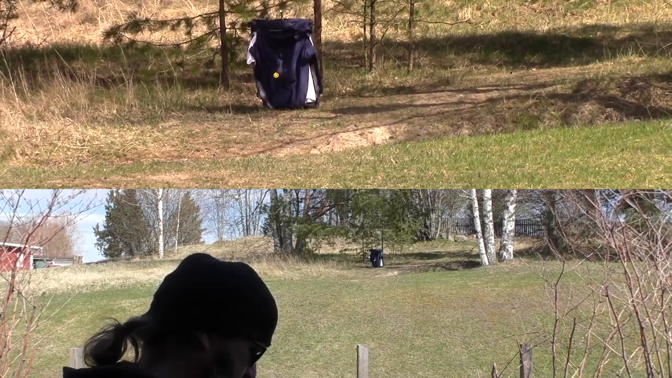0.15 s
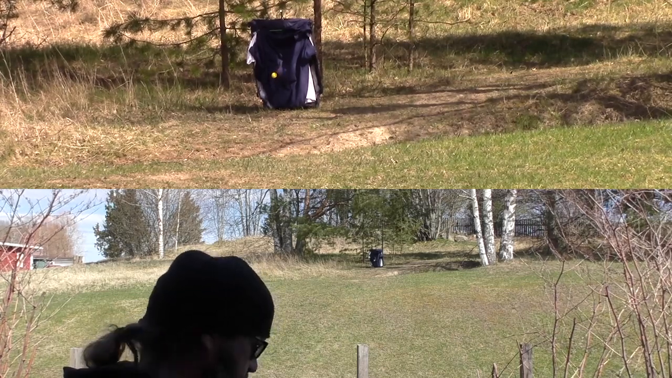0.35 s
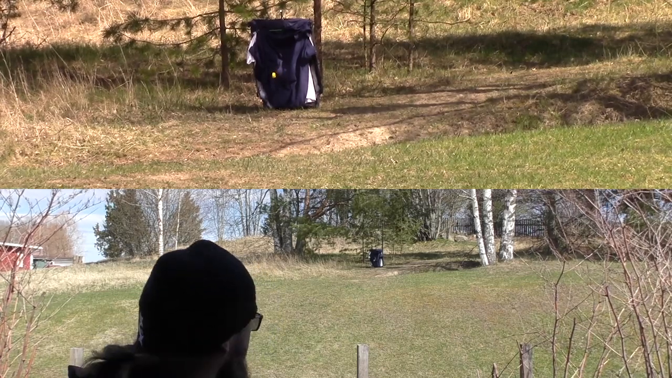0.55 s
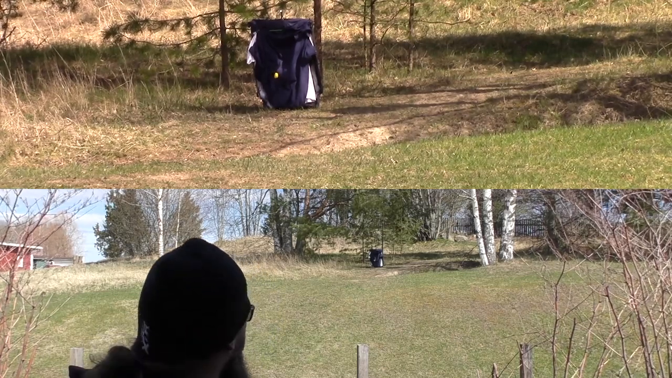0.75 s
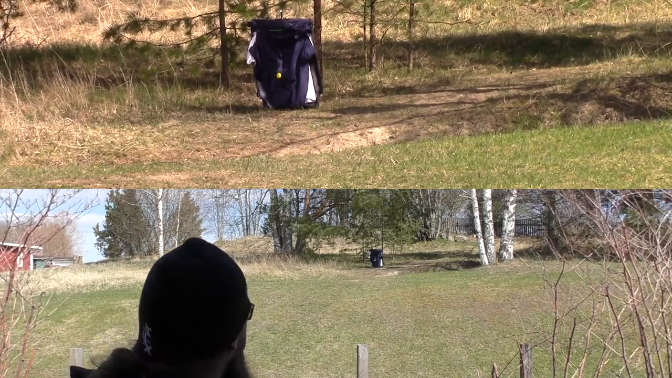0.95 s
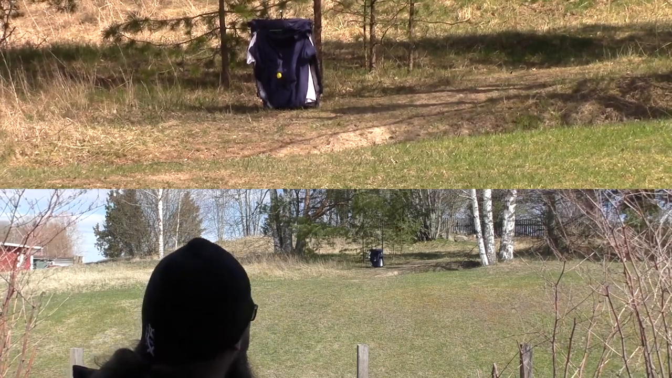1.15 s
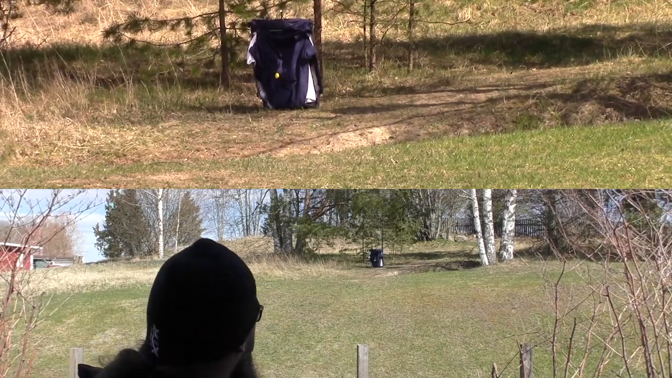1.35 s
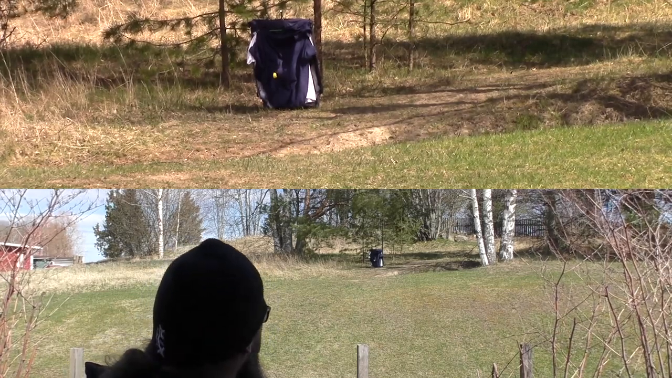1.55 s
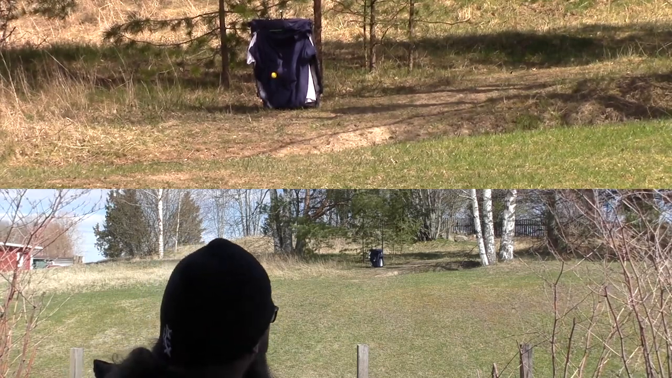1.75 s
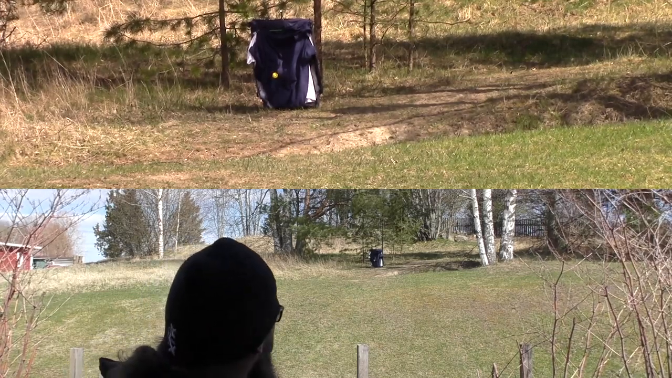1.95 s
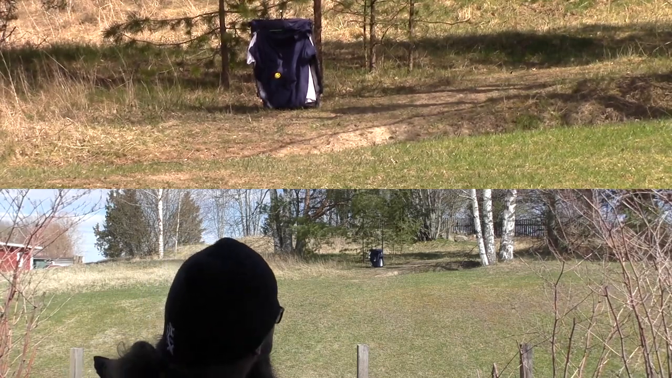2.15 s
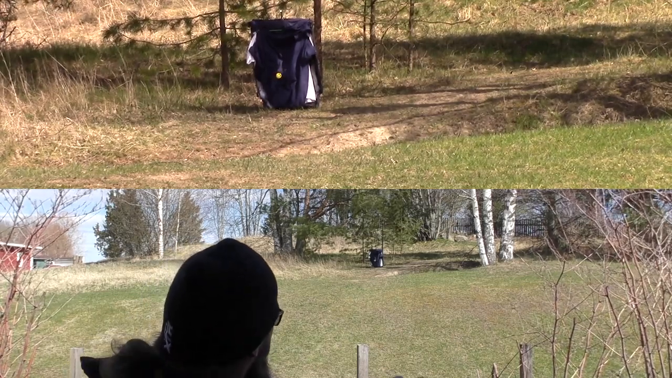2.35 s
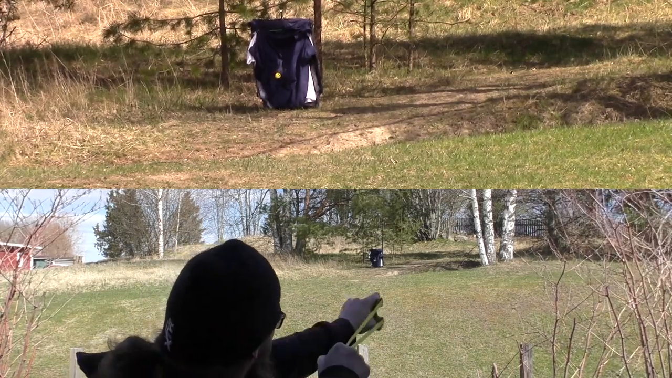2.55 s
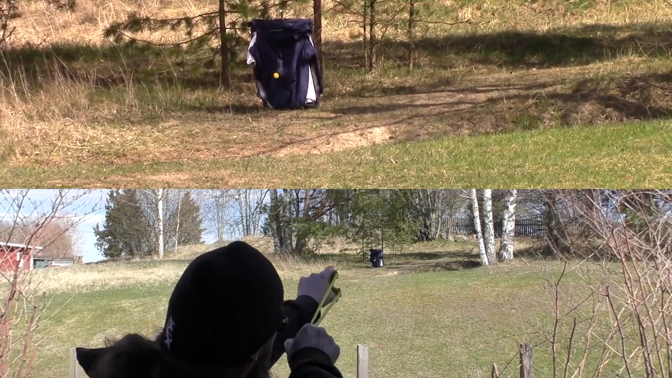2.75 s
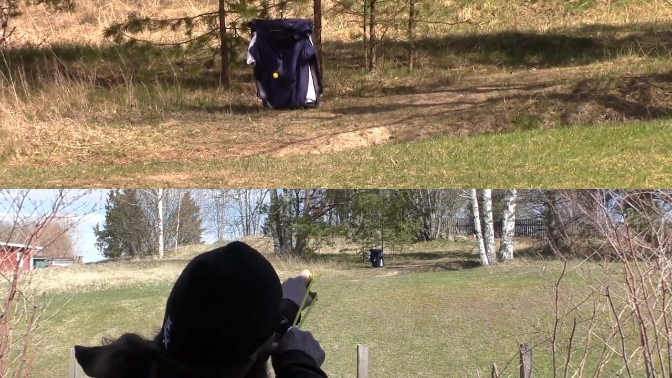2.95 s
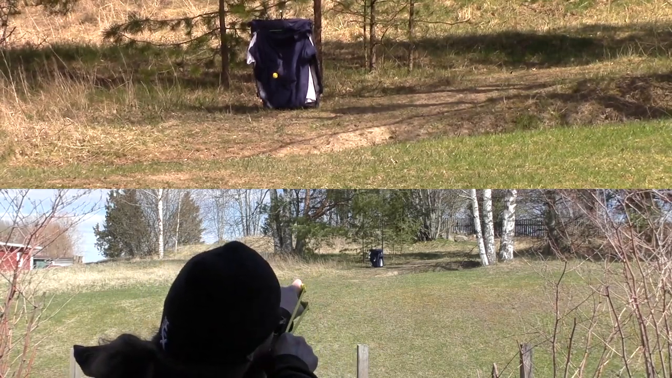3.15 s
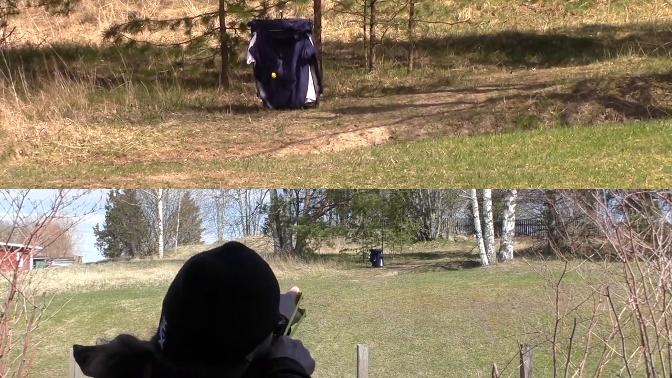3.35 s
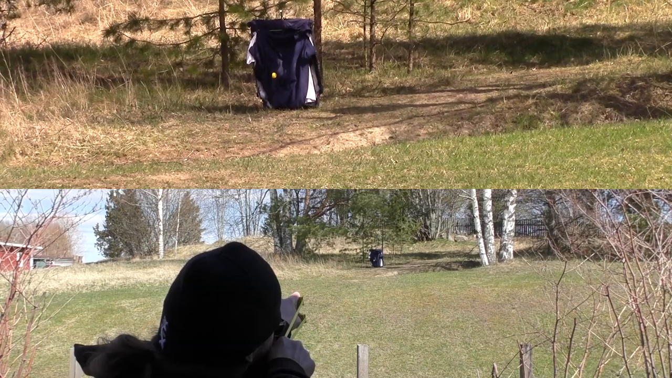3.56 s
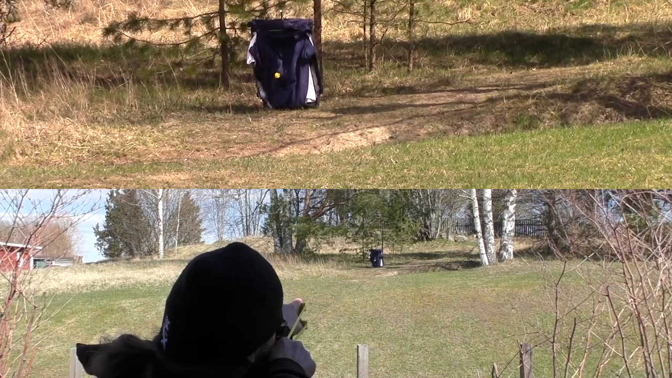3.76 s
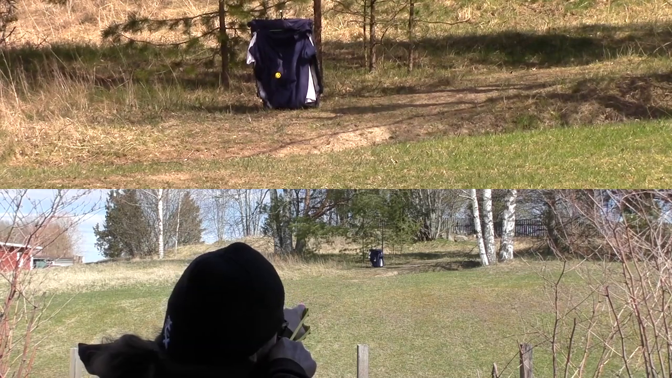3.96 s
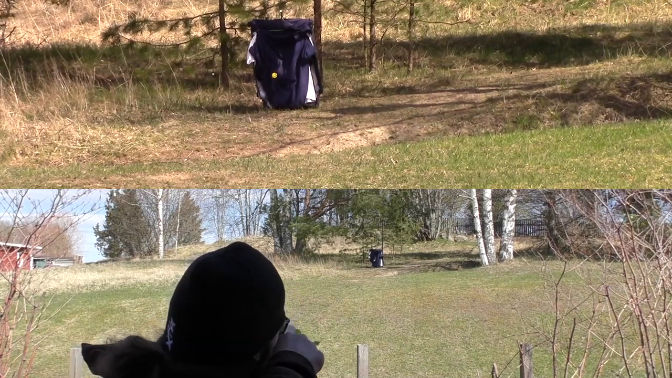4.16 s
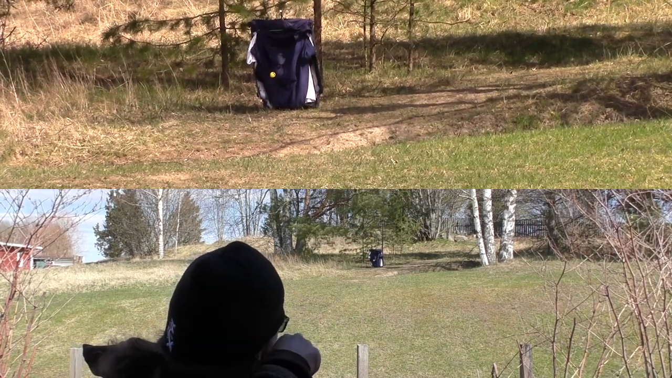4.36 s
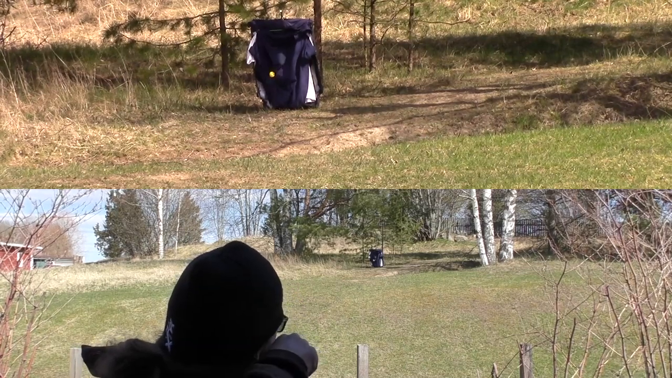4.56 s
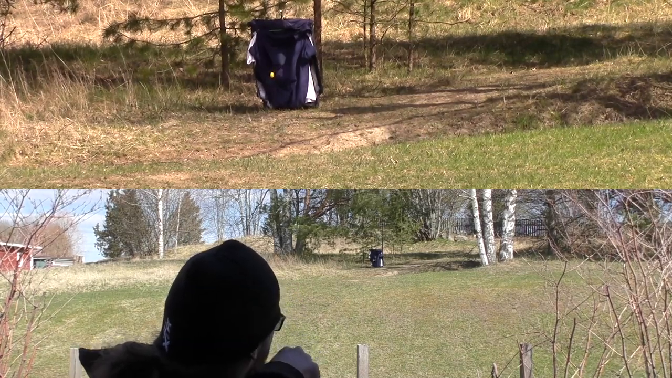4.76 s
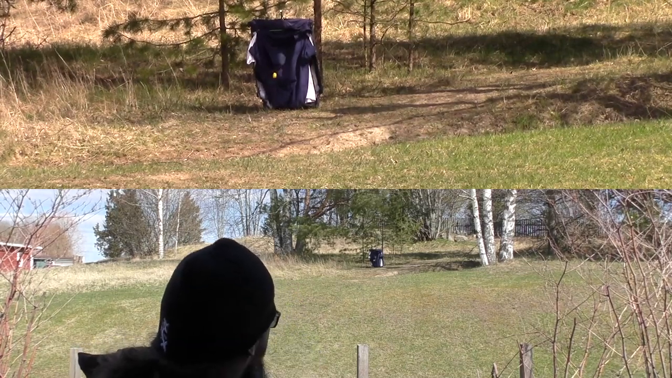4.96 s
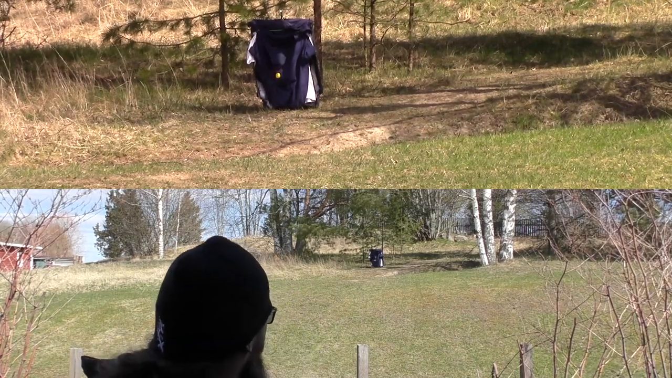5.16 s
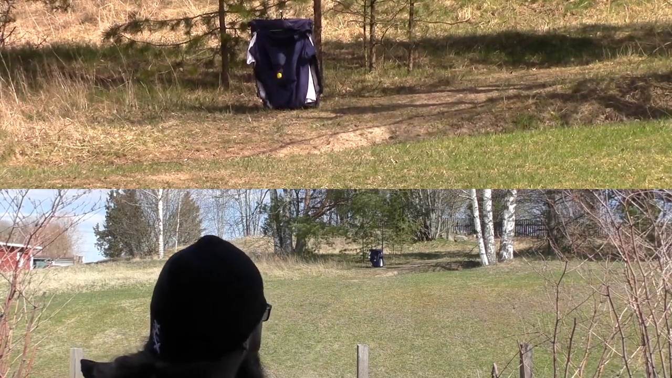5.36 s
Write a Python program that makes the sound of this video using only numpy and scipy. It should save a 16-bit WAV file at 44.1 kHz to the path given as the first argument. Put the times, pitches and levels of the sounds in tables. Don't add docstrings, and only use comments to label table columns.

```python
import sys
import numpy as np
from scipy import signal
from scipy.fft import rfft, irfft, next_fast_len
from scipy.io import wavfile
from scipy.ndimage import uniform_filter1d, map_coordinates

SR = 44100
rng = np.random.default_rng(int(sys.argv[2]) if len(sys.argv) > 2 else 0)


def gain_from_db(level_db):
    decades = np.asarray(level_db, float) / 20
    return 10 ** decades


def dump(signal):
    limited = np.clip(np.atleast_2d(signal).T, -1, 1)
    pcm = np.round(limited * 32767).astype(np.int16)
    wavfile.write(sys.argv[1], SR, pcm)


N = 238400
TIME_S = np.arange(N) / SR

# (frequency [Hz], density [dB per Hz])
BREEZE_SPECTRUM = [(15, -44), (25, -18), (54, 0.5), (91, -5), (113, -1.5), (130, -4), (170, -32),
                   (290, -120)]
# (frequency [Hz], density [dB per Hz])
TRAFFIC_SPECTRUM = [(60, -28), (150, -12.5), (330, -6.5), (480, -3), (560, -10), (800, -11.5), (980, -6.5),
                    (1100, -1), (1250, -6), (1760, -10), (3250, -14.5), (5080, -21), (10900, -24),
                    (16000, -27)]
# (frequency [Hz], density [dB per Hz])
CAR_SPECTRUM = [(70, -23), (120, -2), (180, -0.5), (300, -1.5), (460, -5), (560, -21.5), (800, -60.5)]
# (time [s], level [dB])
CAR_LEVEL = [
    (0, -55),
    (.4, -55),
    (.95, -51),
    (1.4, -54.5),
    (2.7, -55.5),
    (4.2, -57),
    (5.41, -60),
]
# (time [s], held [s], level [dB], pitch [Hz], fade [dB per s])
ENGINES = [
    (.62, 1.0, -59, 170, 30),
    (.45, .5, -62, 127, 30),
    (1.8, .5, -57, 121, 35),
    (5.17, .08, -58, 420, 90),
    (3.66, .06, -58, 205, 120),
]
# (time [s], level [dB], frequency [Hz], t60 [s])
BUFFETS = [
    (1.405, -34.5, 70, 0.086),
    (2.19, -47, 65.1, .1),
    (2.89, -45, 60, .1),
    (4.113, -26.5, 89, 0.1),
]
# (frequency [Hz], correlation [0-1])
LIKENESS = [(60, .8), (290, 0.88), (640, 0.94), (1400, .62), (3100, .45), (6800, 0.86), (15000, 0.62)]
# (time [s], held [s], rub level [dB], sliding over rubbing [dB])
MOVES = [(0.008, 0, -58, 0), (0.065, 0.07, -61.4, -12.9), (0.218, 0.17, -65.4, 1.0), (0.447, 0.03, -57, 1),
         (0.548, 0.0, -61.0, -3.3), (0.656, 0.0, -57.1, -15.3), (0.723, 0.23, -69.3, -0.5),
         (1.013, 0.48, -59.6, -3.6), (1.2, 0.03, -56.7, -6.2), (1.44, 0.14, -57.2, -3.1),
         (1.611, 0.42, -60.5, -9), (2.01, 0.01, -61.4, 0.3), (2.2, 0.18, -61.7, -4.7),
         (2.297, 0.0, -61.5, 4.3), (2.42, 0.02, -56.7, 0.7), (2.535, 0.0, -62.0, -2.6),
         (2.657, 0.11, -63.0, -9.9), (2.844, 0.0, -59.3, -1.5), (2.954, 0.04, -55.6, -2.1),
         (3.007, 0.05, -56.3, -12.8), (3.169, 0.05, -53.8, -7.5), (3.27, 0.21, -58.8, -8.2),
         (3.477, 0.03, -56.1, -1.5), (3.529, 0.33, -58.5, -5), (4.041, 0.02, -63.9, -5.5),
         (4.328, 0.16, -63.4, -4.4), (4.695, 0.11, -62.9, -4.8), (5.079, 0.01, -60.5, -8.5),
         (5.219, 0.05, -59, -4), (5.392, 0.02, -59, -3)]
# (time [s], peak level [dB], frequency [Hz], t60 [s])
CREASES = [(.245, -48, 12000, .04), (.297, -43, 11700, .02), (.439, -44, 11800, .02),
           (0.452, -36, 4000, 0.09), (.452, -46, 11000, .03), (.653, -41, 3200, 0.055),
           (0.964, -47, 10500, 0.032), (1.337, -46, 3500, .02), (1.657, -41, 6480, .04),
           (1.909, -33, 2390, 0.0087), (2.3, -40, 8510, 0.044), (2.418, -37, 8790, 0.031),
           (2.42, -43, 12500, .02), (2.755, -43.5, 9000, 0.018), (2.985, -45, 10900, .02),
           (2.95, -44, 2675, 0.18), (3.02, -44, 2730, .12), (3.22, -45, 3190, .08), (1.35, -42, 2600, .06),
           (3.4, -43, 3500, .02), (3.187, -37.5, 4790, .06), (3.475, -47, 12500, .02),
           (3.49, -42, 4500, .04), (4.342, -40, 2750, .04), (4.702, -44, 6500, .04),
           (4.704, -44, 4500, 0.046), (5.219, -39, 10400, .025), (5.22, -40, 4000, 0.022),
           (5.245, -41, 2600, .08)]
# (frequency [Hz], density [dB per Hz])
RUB_SPECTRUM = [(800, -30), (1500, -1), (3000, 3), (5000, -1.5), (8000, -16), (16000, -40)]
# (frequency [Hz], density [dB per Hz])
SLIDE_SPECTRUM = [(3000, -35), (5500, 0), (8000, 0), (12000, -1), (16000, -7)]
# (time [s], click level [dB], barrel level [dB], click pitch [Hz], top part boost [dB])
KNOCKS = [
    (4.4406, -16, 0.5, 3100, 2),
    (4.4442, -21, -12, 3500, -6),
]
# (pitch ratio [1], level [dB], length [cycles])
CLICK_PARTS = [(1, 0.5, 1.56), (1.8, -7, 2.8), (3.7, -14, 3.6)]
# (frequency [Hz], level [dB], t60 [s])
BARREL_MODES = [(214, -36.5, 0.096), (276, -36.5, 0.12), (400, -35.5, .07), (516, -37, 0.031),
                (790, -38, 0.035), (3400, -34, .015)]
# (time [s], peak level [dB], frequency [Hz], t60 [s], left over right [dB])
SLAPS = [(4.1003, -21, 1900, .012, -1), (4.1015, -27, 2000, .01, 0), (4.1108, -5.5, 2200, .003, 6),
         (4.1122, 6, 11500, .005, -2), (4.1131, -14, 6100, 0.0042, 0), (4.1128, -14, 1470, 0.0081, -2),
         (4.1178, -13, 1500, .01, -1), (4.1157, -5, 12000, .006, 7), (4.1172, -5, 13500, .007, 8),
         (4.1193, -2, 2940, 0.0042, 0), (4.1194, -5, 5060, .003, 0), (4.1195, -2.5, 7200, .006, -6),
         (4.1203, -7, 12000, .005, 2), (4.1178, -1.5, 14500, 0.0066, 3), (4.124, -10, 6400, .007, 0),
         (4.1255, -9, 12500, .012, -3), (4.1318, -11.5, 2170, .012, -3), (4.136, -3.5, 8740, .006, 3),
         (4.1445, -10, 8000, .006, -0.5), (4.5955, -32, 2080, 0.016, 4), (4.612, -36, 2400, .03, 0),
         (4.604, -41, 4600, .05, 0), (4.6005, -38, 4500, .008, 5.5)]
# (frequency [Hz], density [dB per Hz])
RUBBER_SPECTRUM = [(300, -30), (600, -19), (850, -11), (1400, -1), (2200, -4.5), (3500, -4), (6000, -5.5),
                   (9000, -4.5), (13000, -4), (16000, -11)]
# (time [s], held [s], level [dB], rise [dB per s], fall [dB per s])
BAND_STAGES = [
    (4.1102, 0, -28, 2900, 900),
    (4.1117, .009, -15, 9000, 800),
    (4.12, .027, -19.5, 3000, 450),
    (4.12, 0, -41.5, 3000, 110),
    (4.596, .005, -48, 17000, 330),
]
# (time [s], level [dB])
JOLTS = [
    (4.101, -28),
    (4.113, -8),
    (4.1277, -10),
    (4.1314, -17),
    (4.1461, -22),
    (4.1645, -27),
    (4.1829, -31),
    (4.2197, -36),
]
# (frequency [Hz], width [Hz], level [dB])
WRIST_MODES = [(212, 43, -3.5), (272, 26, -.5), (313, 45, -2.5), (404, 38, -1), (474, 60, -8.5),
               (820, 60, -22.5)]
# (frequency [Hz], level [dB], t60 [s])
FORK_MODES = [(850, -31, .1), (1450, -27, 0.13), (2040, -36, 0.4), (2110, -36, 0.5), (2234, -28, .16),
              (3560, -27.5, 0.132)]
# (time [s], level [dB], frequency [Hz], t60 [s])
PUFF = (4.119, -8, 150, .026)
# (frequency [Hz], t60 [s])
PORCH_DECAY = [(200, 0.15), (2000, 0.27), (6000, 0.2), (14000, 0.13)]


def unit(x):
    return x / np.sqrt(np.mean(x ** 2) + 1e-20)


def along(points, hz):
    f, v = np.transpose(points)
    return np.interp(np.log(hz + 1), np.log(f + 1), v)


def wobble(rate_hz):
    knots = rng.standard_normal(int(N * rate_hz / SR) + 4)
    return map_coordinates(knots, [TIME_S * rate_hz])


def swell(s, held_s, db, rise, fall):
    t = TIME_S - s
    return gain_from_db(db - rise * np.clip(-t, 0, None) - fall * np.clip(t - held_s, 0, None))


def filtered(x, response):
    m = next_fast_len(N + SR // 2)
    return irfft(rfft(x, m) * response(np.fft.rfftfreq(m, 1 / SR)), m)[..., :N]


def resonant(x, peaks):
    def response(f):
        return sum(gain_from_db(db) * 1j * f * w / (c * c - f * f + 1j * f * w) for c, w, db in peaks)
    return filtered(x, response)


def rush(spectrum, likeness, patchy_db):
    z = signal.stft(rng.standard_normal((2, N)), nperseg=512)[2]
    field = uniform_filter1d(rng.standard_normal(z.shape[1:]), size=6, axis=0)
    field = uniform_filter1d(field, size=10, axis=1)
    pair = signal.istft(z * gain_from_db(patchy_db * unit(field)), nperseg=512)[1][:, :N]

    def mid_side(hz):
        turn = np.arccos(np.clip(along(likeness, hz), -1, 1)) / 2
        return gain_from_db(along(spectrum, hz)) * [np.cos(turn), np.sin(turn)]
    mid, side = filtered(pair, mid_side)
    return unit(np.array([mid + side, mid - side]))


def add(out, s, sound):
    start = round(s * SR)
    out[..., start:start + sound.shape[-1]] += sound


def burst(hz, t60, rough, rise):
    t = np.arange(SR // 10) / SR
    steps = rng.standard_normal((3, len(t)))
    wander = rough * np.sqrt(hz / SR) * np.cumsum(steps[0] + 0.3 * steps[1:], axis=1)
    envelope = gain_from_db(-60 * t / t60) * (1 - np.exp(-t / (rise * t60)))
    return np.sin(2 * np.pi * hz * t + wander) * envelope


def ring(modes, attack_s, rough=0):
    t = np.arange(SR // 2) / SR
    wander = rough * np.cumsum(rng.standard_normal((len(modes), len(t))), axis=1)
    out = np.zeros(len(t))
    for (hz, db, t60), phase in zip(modes, wander):
        out += gain_from_db(db - 60 * t / t60) * np.sin(2 * np.pi * hz * t + phase)
    return out * (1 - np.exp(-t / attack_s))


def echoes(x, delay_s):
    hz, t, z = signal.stft(rng.standard_normal((2, SR // 2)), SR, nperseg=256)
    decay = gain_from_db(-60 * t / along(PORCH_DECAY, hz)[:, None])
    tail = signal.istft(z * decay, SR, nperseg=256)[1]
    tail = 0.29 * tail[0] + 0.98 * tail
    late = np.pad(x.mean(0), (round(delay_s * SR), 0))[None]
    return signal.fftconvolve(late, tail / np.linalg.norm(tail[0]), axes=1)[:, :N]


def wall(x):
    delay_s, level_db = .174, -36
    late = np.roll(x, round(delay_s * SR), axis=1)
    return gain_from_db(level_db) * resonant(late, [(2600, 3000, 0)])


def engines():
    sag_per_s = .03
    out = np.zeros(N)
    for s, held_s, db, hz, fade in ENGINES:
        from_middle_s = np.clip(TIME_S - s - held_s / 2, -.6, .6)
        pitch_hz = hz * (1 - sag_per_s * from_middle_s) + 2.56 * wobble(10)
        gain = swell(s, held_s, db, fade, fade) * gain_from_db(2.9 * wobble(7.93))
        out += gain * np.sin(2 * np.pi * np.cumsum(pitch_hz) / SR)
    return out


def outdoors():
    breeze_db, traffic_db = -58.7, -50.6
    lumps = gain_from_db(0.48 * wobble(3) + 1.8 * wobble(20))
    gusts = np.zeros((2, N + SR))
    for s, db, hz, t60 in BUFFETS:
        add(gusts, s, ring([(hz, db, t60)], attack_s=0.0036))
    breeze = unit(lumps * rush(BREEZE_SPECTRUM, LIKENESS, patchy_db=0.7))
    breeze *= gain_from_db(breeze_db + 1.2 * wobble(1.5))
    car = unit(lumps * rush(CAR_SPECTRUM, LIKENESS, patchy_db=1.35))
    car *= gain_from_db(np.interp(TIME_S, *np.transpose(CAR_LEVEL)))
    traffic = rush(TRAFFIC_SPECTRUM, LIKENESS, patchy_db=1.05)
    traffic *= gain_from_db(traffic_db + 0.72 * wobble(6))
    return gusts[:, :N] + engines() + breeze + car + traffic


def jacket():
    rise, fall, rest_db = 800, 310, -72
    moves = np.array([swell(s, held_s, db, rise, fall) for s, held_s, db, _ in MOVES]) ** 2
    slide_share = gain_from_db(2 * np.array(MOVES)[:, 3])
    rubbing = np.sqrt(moves.sum(0)) + gain_from_db(rest_db)
    sliding = np.sqrt(slide_share @ moves) + gain_from_db(rest_db - 3)
    ticks = np.zeros((2, N + SR))
    for s, db, hz, t60 in CREASES:
        add(ticks, s, gain_from_db(db) * burst(hz, t60, rough=0.73, rise=0.051))
    grain = gain_from_db(0.87 * wobble(35) + 1.9 * wobble(300))
    rub = gain_from_db(2.2) * rubbing * unit(grain * rush(RUB_SPECTRUM, LIKENESS, patchy_db=1.7))
    slide = gain_from_db(2.8) * sliding * unit(grain * rush(SLIDE_SPECTRUM, LIKENESS, patchy_db=2.2))
    return ticks[:, :N] + rub + slide


def target():
    out = np.zeros(N + SR)
    t = np.arange(-200, 200) / SR
    for s, db, body_db, hz, edge_db in KNOCKS:
        click = np.zeros(len(t))
        for ratio, part_db, cycles in CLICK_PARTS:
            part_hz = ratio * hz
            gain = gain_from_db(part_db + edge_db * (ratio > 3))
            envelope = np.exp(-(2.4 * t * part_hz / cycles) ** 2)
            click += gain * np.cos(2 * np.pi * part_hz * t + .6) * envelope
        add(out, s - 200 / SR, gain_from_db(db - 2) * click)
        add(out, s, gain_from_db(body_db) * ring(BARREL_MODES, attack_s=0.00061, rough=0.028))
    return out[:N] * gain_from_db(np.array([[-.5], [.5]]))


def wrist():
    pushes = np.zeros(N)
    for s, db in JOLTS:
        pushes[round(s * SR)] = -gain_from_db(db + 35.5)
    soft = filtered(pushes, lambda f: 1 / (1 + 1j * f / 800) ** 2)
    return resonant(soft, WRIST_MODES)


def band_hiss():
    flutter = gain_from_db(2.4 * wobble(400) + 1.5 * wobble(1500) + 0.94 * wobble(70))
    likeness = [(500, 0.6), (6000, 0.92), (15000, .75)]
    effort = np.sqrt(sum(swell(*stage) ** 2 for stage in BAND_STAGES))
    return effort * unit(flutter * rush(RUBBER_SPECTRUM, likeness, patchy_db=0.8))


def slingshot():
    out = np.zeros((2, N + SR))
    for s, db, hz, t60, pan_db in SLAPS:
        gain = gain_from_db(db + 2.5 + pan_db * np.array([[.5], [-.5]]))
        add(out, s, gain * burst(hz, t60, rough=0.75, rise=0.069))
    add(out, 4.1192, ring(FORK_MODES, attack_s=.002, rough=.055))
    s, db, hz, t60 = PUFF
    puff = ring([(hz, db, t60)], attack_s=.003)
    add(out, s, np.array([[1], [-.5]]) * puff)
    return out[:, :N] + band_hiss() + wrist()


def scene():
    background = outdoors() + jacket()
    knock, shot = target(), slingshot()
    knock_echo = gain_from_db(-8) * echoes(knock, delay_s=0.00097)
    shot_echo = gain_from_db(-11) * echoes(shot, delay_s=.004)
    return background + knock + knock_echo + shot + wall(shot) + shot_echo


def low_pass(x):
    return signal.sosfilt(signal.butter(12, 16120, fs=SR, output="sos"), x)


def record(dry):
    band = filtered(dry, lambda hz: 1 / (1 + (hz / 15800) ** 200))
    return low_pass(np.clip(band, -1, 1))


dry = scene()
out = record(dry)
dump(out)
```